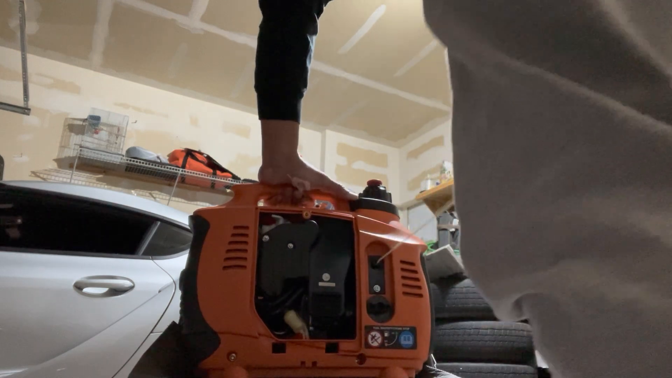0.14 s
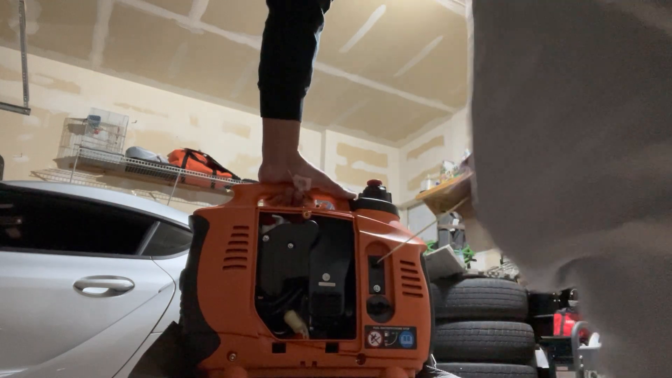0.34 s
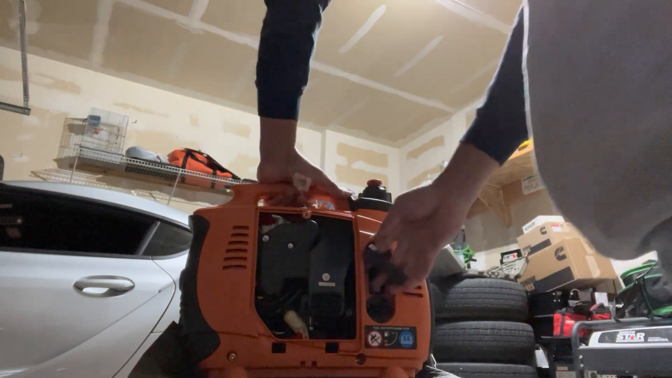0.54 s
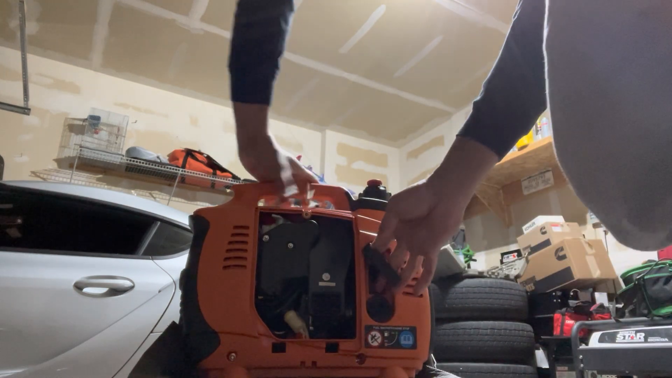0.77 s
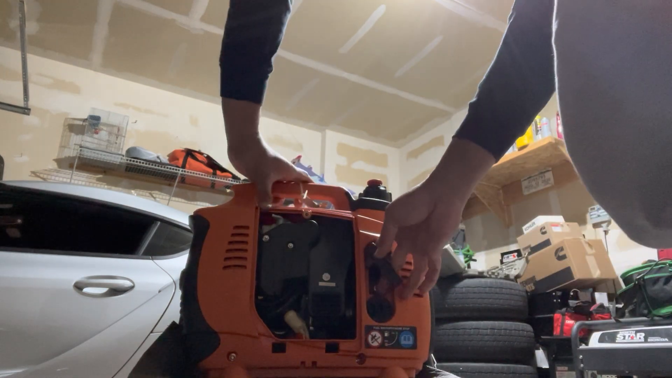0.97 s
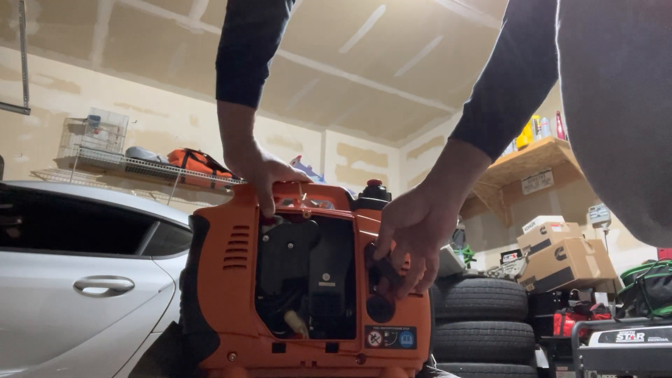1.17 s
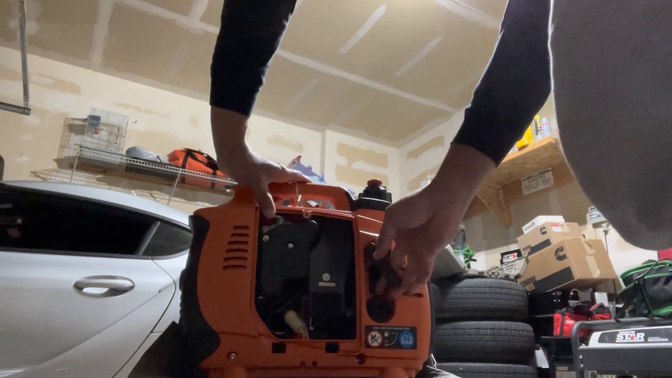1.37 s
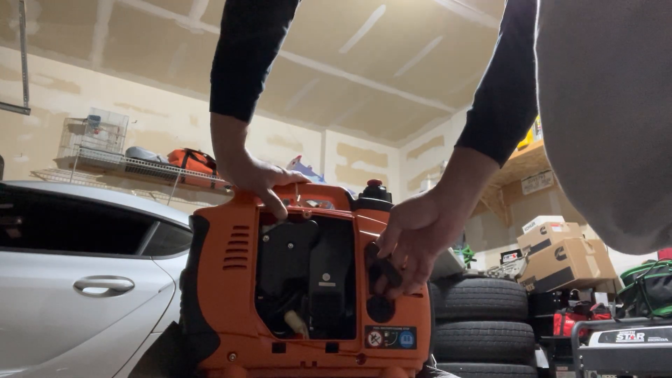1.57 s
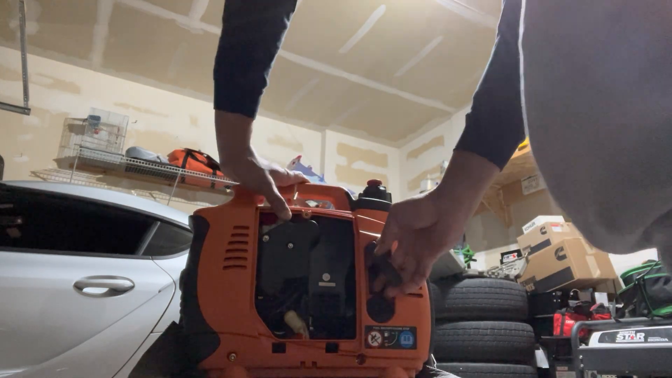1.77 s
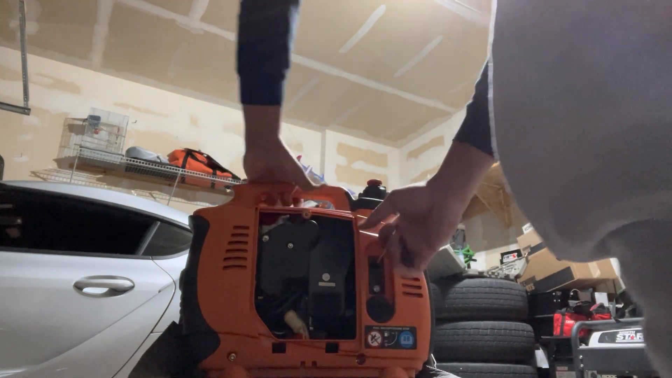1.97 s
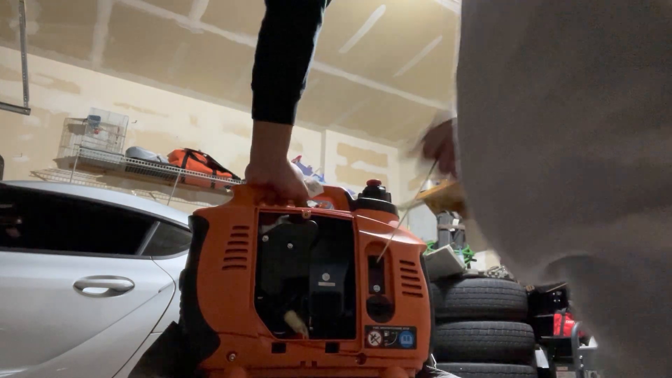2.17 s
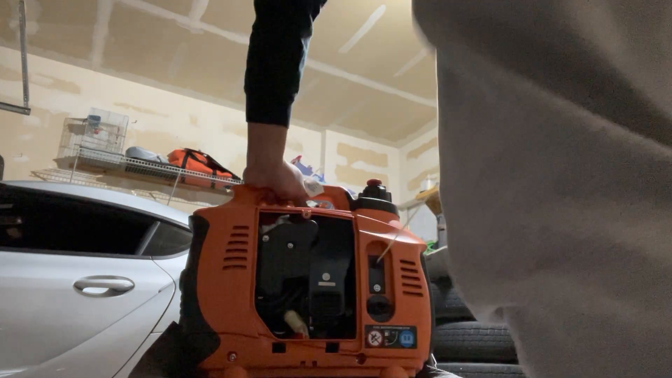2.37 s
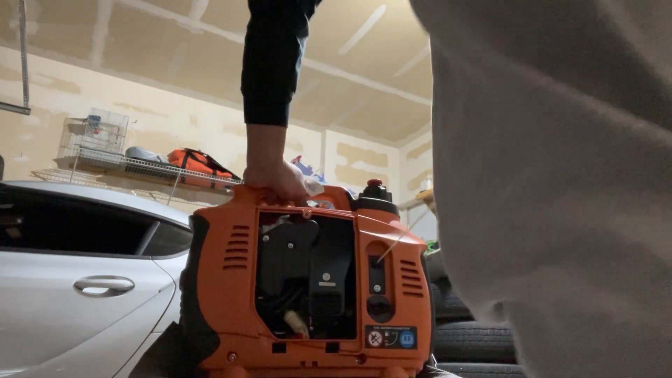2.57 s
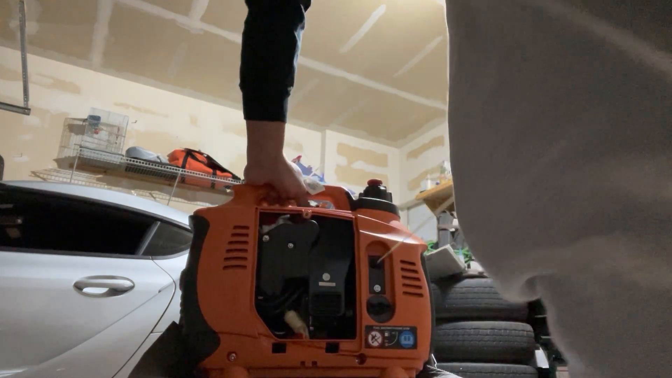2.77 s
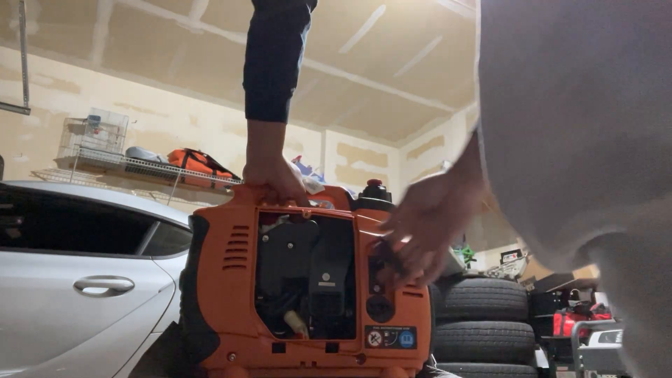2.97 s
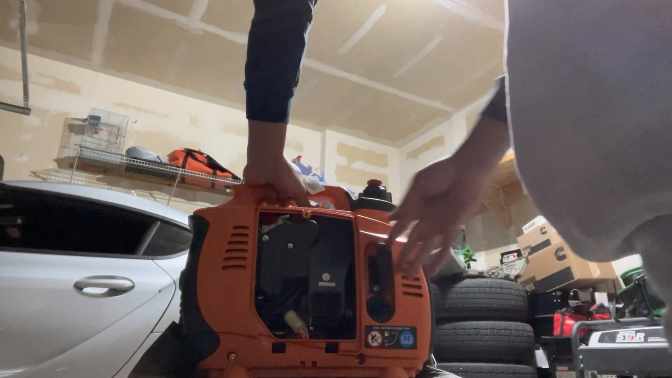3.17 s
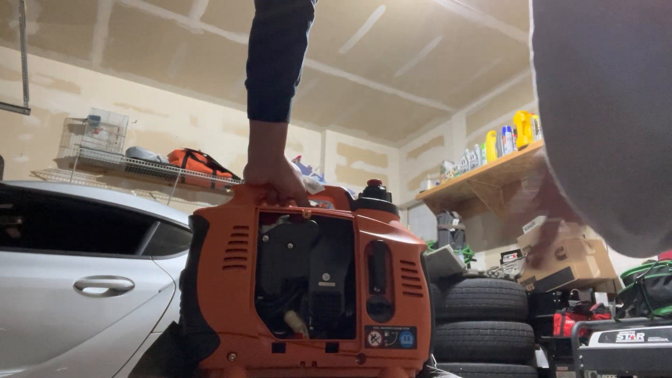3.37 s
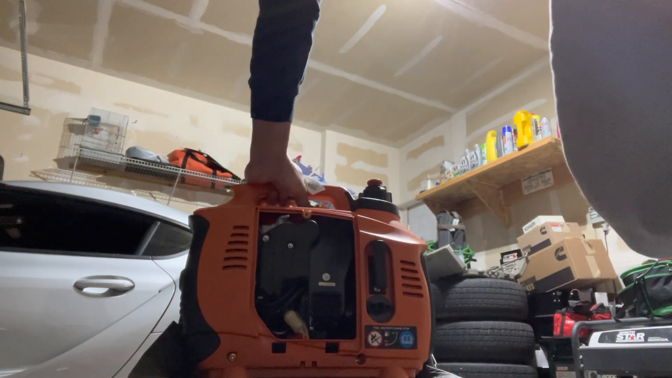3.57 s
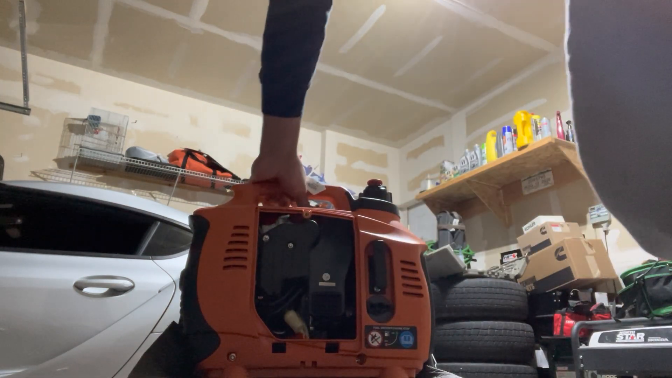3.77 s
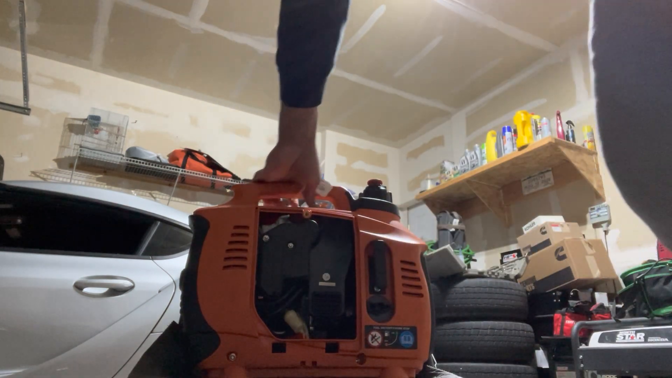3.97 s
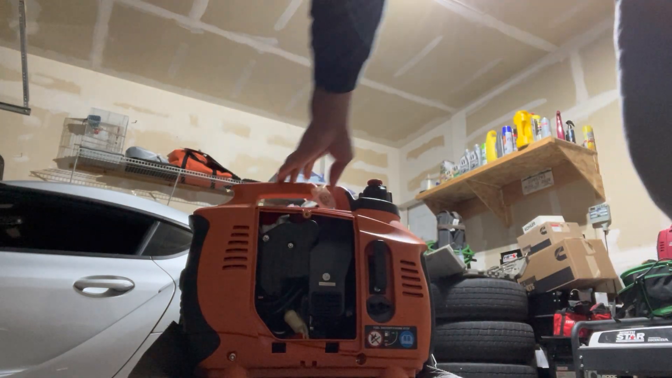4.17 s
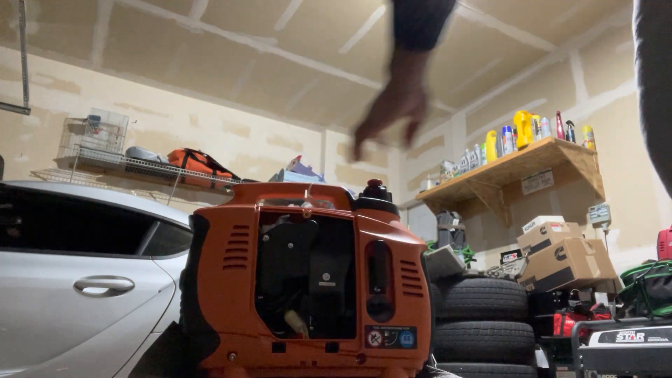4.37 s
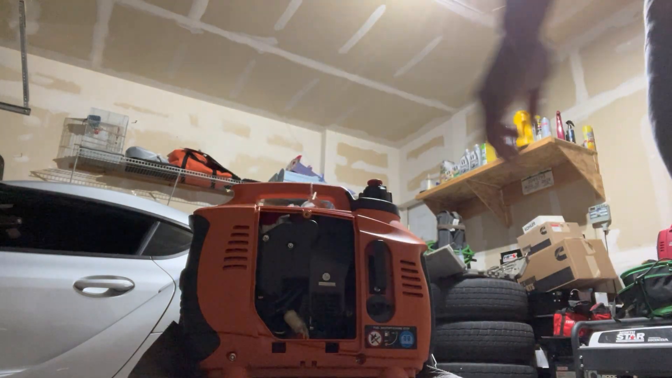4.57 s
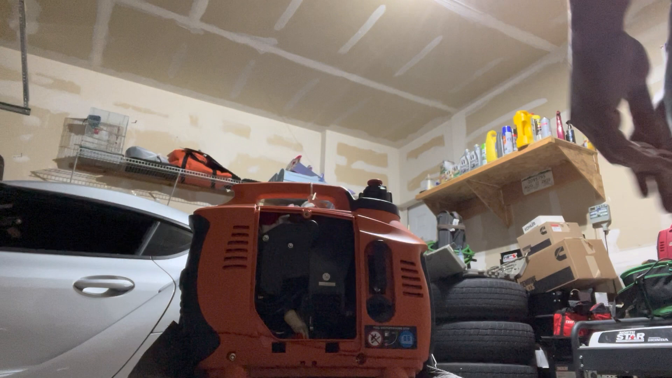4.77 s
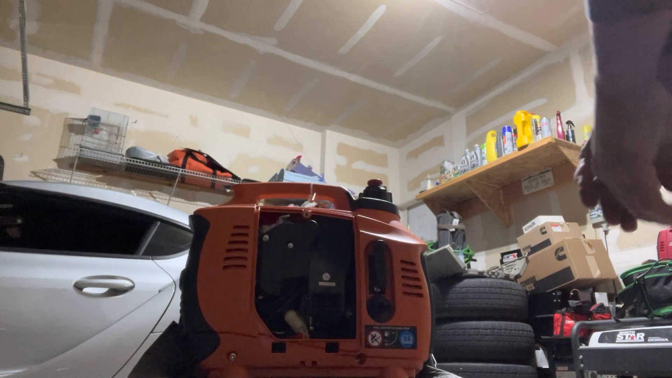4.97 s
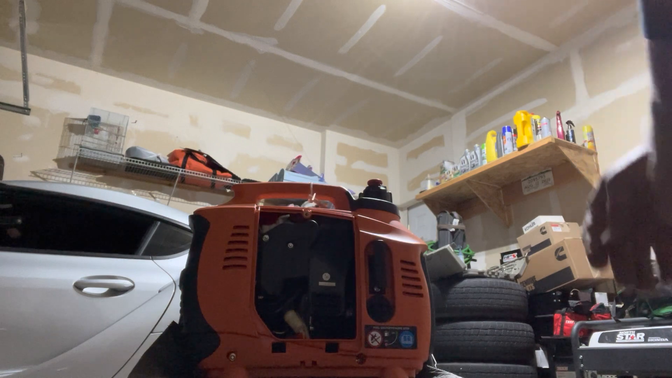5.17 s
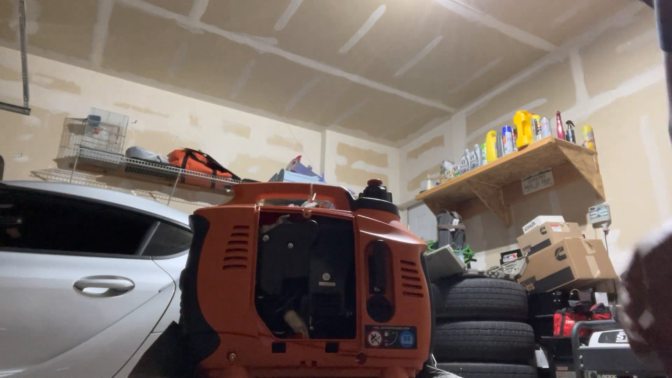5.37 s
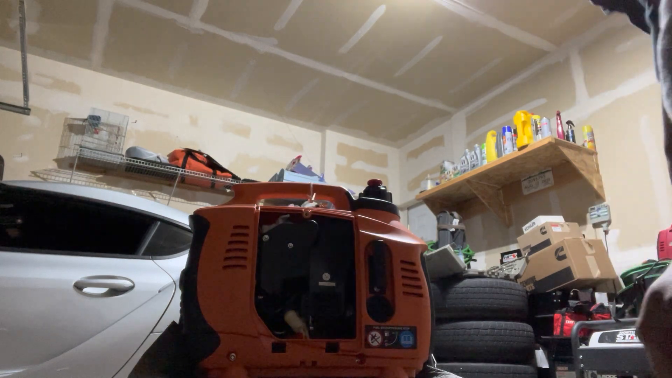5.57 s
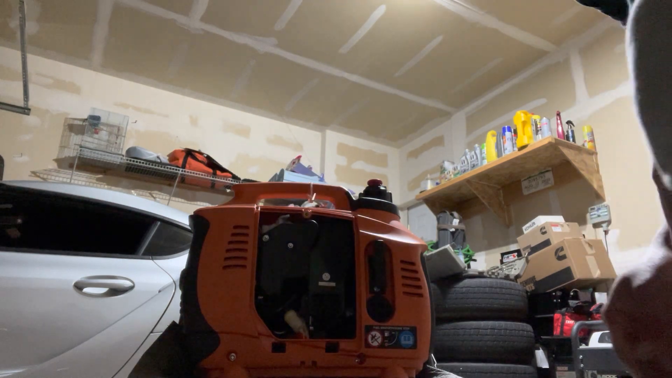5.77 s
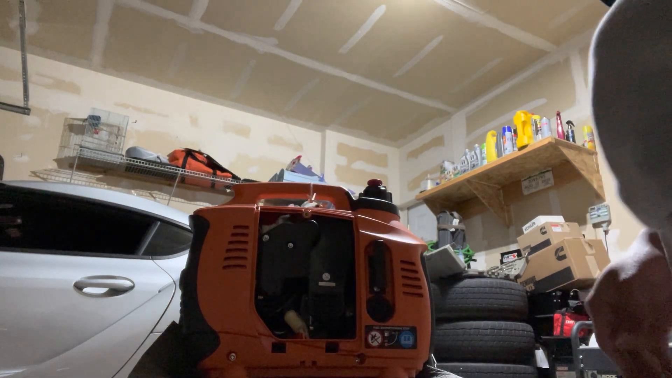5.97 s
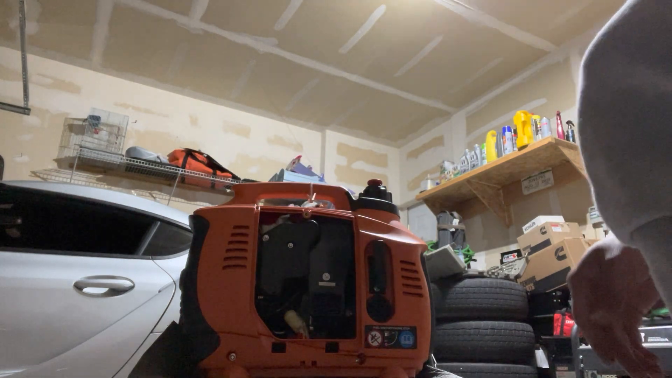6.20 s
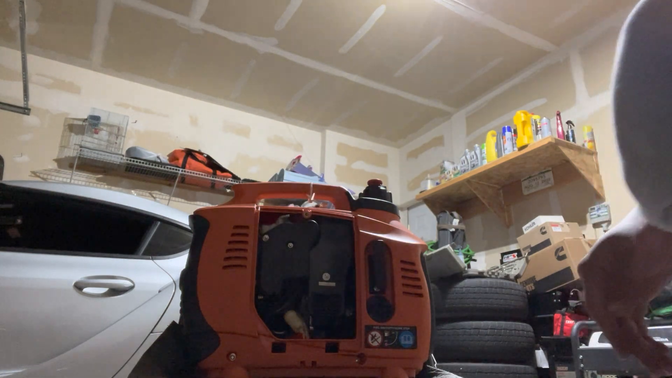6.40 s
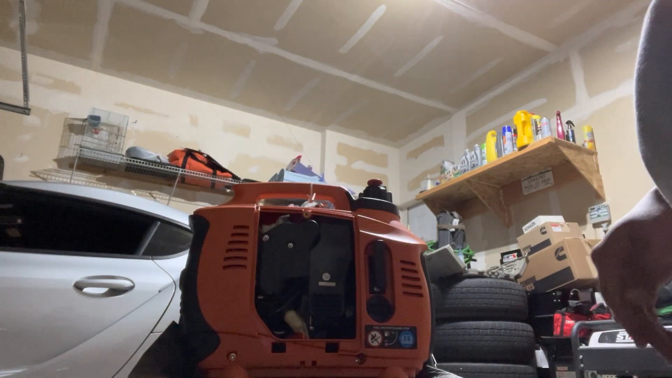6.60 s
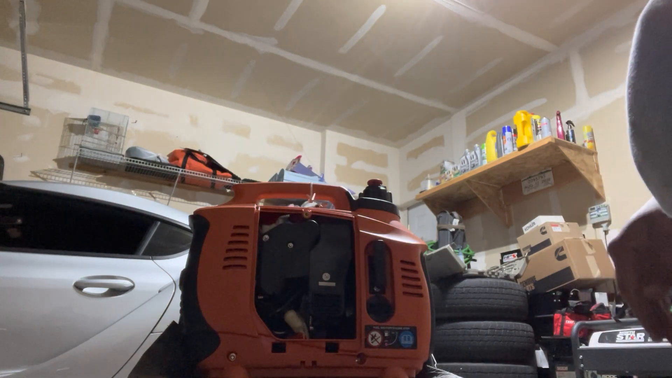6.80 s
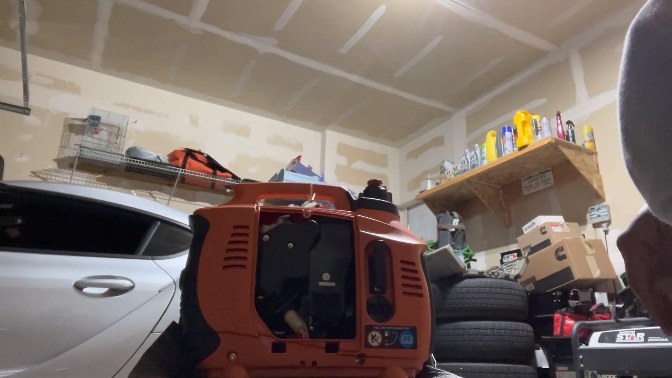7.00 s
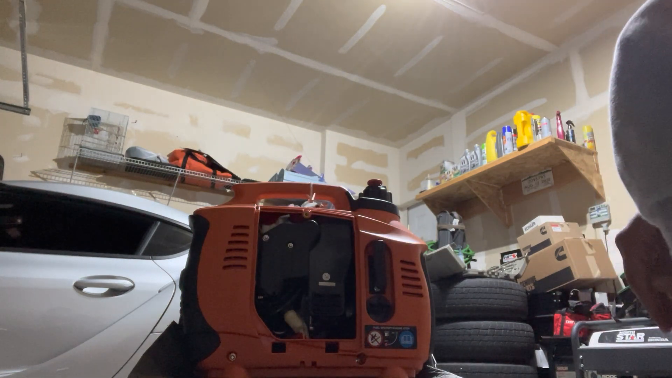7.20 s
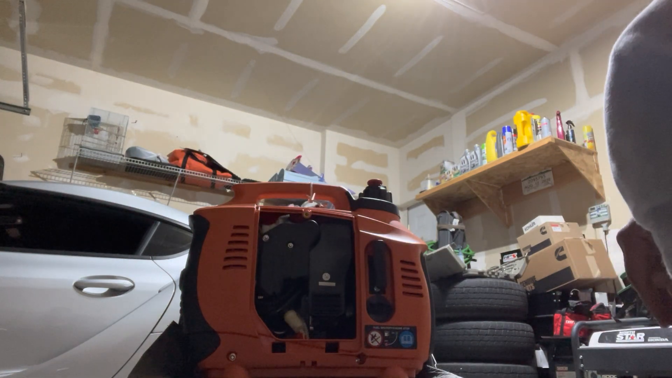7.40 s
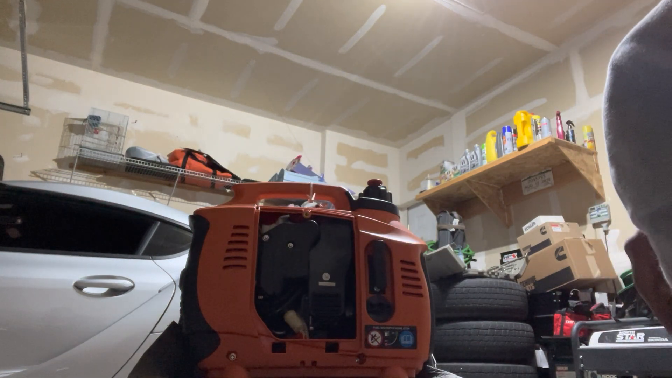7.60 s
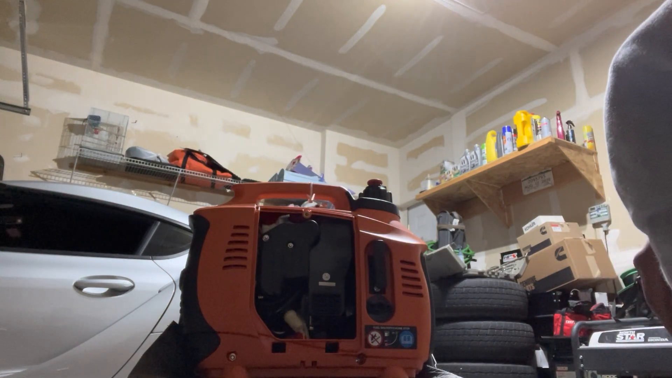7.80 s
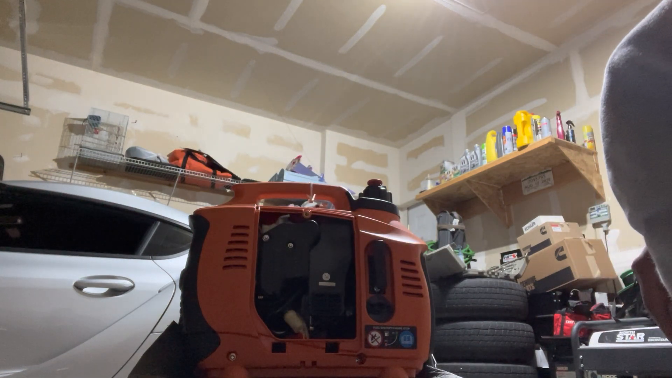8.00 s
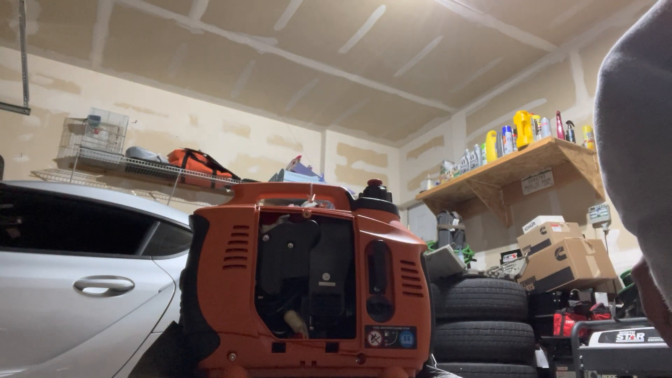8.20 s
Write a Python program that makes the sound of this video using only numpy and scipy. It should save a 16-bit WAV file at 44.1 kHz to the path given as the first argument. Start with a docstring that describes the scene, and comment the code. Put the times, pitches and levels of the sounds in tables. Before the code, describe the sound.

A small portable generator is pull-started, heard from very near in stereo with short garage echo. First come the pawls' plastic rattle and a falling whirr, slowing to sparse dull clacks. After a quiet gap there are snaps, housing knocks and a fresh upward whirr with rope rasp. Firing quickens into a rapid roar with exhaust boom, valve ticking and thin whine, then holds nearly steady.

```python
"""The rumble of a starter reel winding down is heard first, with clacks, as the rope of a small generator runs home.
The choke clicks, the housing is bumped and a second pull whirrs up; the single four-stroke cylinder catches,
races up and settles in a garage. Reel, rope and contacts are coloured noise and struck resonances; knock, exhaust
boom, valve ticks and whine all follow one curve of engine speed."""
import sys
import numpy as np
from scipy import signal
from scipy.fft import rfft, irfft, next_fast_len
from scipy.io import wavfile

SR = 44100
rng = np.random.default_rng(int(sys.argv[2]) if len(sys.argv) > 2 else 0)


def unload_wav(signal):
    """Save mono or channel-first audio to the path in sys.argv[1] as 16-bit WAV at rate SR, clipped to [-1, 1]."""
    wavfile.write(
        sys.argv[1],
        SR,
        np.round(np.clip(np.atleast_2d(signal).T, -1, 1) * 32767).astype(np.int16),
    )


N = 363825
TIME = np.arange(N) / SR

# Levels in dB are relative within the chain that uses them.
# Pulls on the rope. Each row: drawn from in seconds, let back in seconds, rumble in dB, rope hiss in dB.
PULLS = [(-.6, 0.0, -30.5, -45), (1.957, 2.912, -29, -42)]
# Whirrs of the reel. Each row: start in seconds, end in seconds, start pitch in Hz, end pitch in Hz, level in dB.
WHIRRS = [(0.022, .44, 1077, 655, -41), (0.077, 0.254, 742, 646, -51), (2.119, 2.18, 680, 903, -37.5),
          (2.195, 2.521, 721, 1417, -35.5), (2.159, 2.349, 1077, 1320, -44),
          (2.217, 2.344, 1657, 2380, -40)]
# Clacks of the pawls, the handle and loose parts. Each row: time in seconds, level in dB, dull above in Hz.
CLACKS = [(.018, -24, 4500), (.047, -25, 4000), (.058, -22, 1600), (.087, -25, 5000), (.108, -28, 2500),
          (.125, -22, 2600), (.172, -28, 3000), (.2, -24, 3500), (.222, -28, 3000), (.248, -29, 1400),
          (.289, -25, 3500), (.343, -28, 3000), (.388, -28, 3000), (.445, -34, 3500), (.507, -23, 2800),
          (.541, -24, 3200), (.582, -29.5, 3000), (.621, -32, 3000), (.663, -26, 3000), (.708, -32, 3000),
          (.803, -36, 1500), (.843, -38, 3000), (.935, -39, 2600), (1.019, -34, 1700), (1.23, -47, 1300),
          (2.28, -22, 1600), (2.426, -20, 2000), (2.478, -17.5, 3500), (4.872, -20, 3000),
          (5.915, -24, 3000)]
# Short sharp sounds: plastic snaps, the choke's click and, near 2.45-2.62 s, first intake gasps.
# Each row: time in seconds, level in dB, dull above in Hz.
SHARP_SOUNDS = [(0.085, -43, 15000), (0.286, -41.5, 15000), (0.539, -50, 6000), (1.08, -63, 15000),
                (1.459, -62.5, 5000), (1.6497, -29, 7500), (1.853, -53, 4500), (1.9211, -46, 14000),
                (2.191, -45, 15000), (2.417, -44, 15500), (2.447, -27.5, 13900), (2.577, -39, 14000),
                (2.606, -37, 14000), (2.622, -37, 14000), (2.905, -33, 15000), (2.9956, -18.5, 2620)]
# Soft bumps on the housing. Each row: time in seconds, level in dB, pitch in Hz.
BUMPS = [(0.825, -29, 232), (0.837, -31, 233), (0.839, -24.5, 105), (1.949, -27, 490), (1.962, -24.5, 394),
         (1.996, -24, 314), (2, -34, 674), (4.872, -23, 110)]
# Resonances of the plastic shell. Each row: frequency in Hz, width in Hz, level in dB.
SHELL_MODES = [(275, 40, -3), (385, 30, -5), (750, 60, -1), (990, 110, 5), (1200, 70, 3), (1940, 300, -13),
               (3500, 500, -21), (4070, 200, -19)]
# Exhaust and room boom. Each row: frequency in Hz, width in Hz, level in dB.
BOOM_MODES = [(158.4, 18, 18), (231.1, 11.5, 24), (247.7, 24.6, 22), (266.3, 4.1, 18), (311.6, 26.5, 18),
              (353.3, 13, 14.5), (437, 34, 14), (476, 6.9, 7), (521, 9, 12)]
# Engine block and housing. Each row: frequency in Hz, width in Hz, level in dB.
BLOCK_MODES = [(576, 19, 4), (649.2, 41.7, 23), (688, 26, 11), (778, 6.3, -2), (927, 30, 0.5),
               (1141, 89, 8.5), (1212, 30, 15), (1260, 34, 16), (1293, 14, 11), (1463, 27, 11.5),
               (1600, 32, 12.5)]
# First blow of each firing, straight from the open casing. Each row: frequency in Hz, width in Hz, level in dB.
BARK_MODES = [(670, 330, 9.5), (1250, 300, 4)]
# Thin rings of the valve cover. Each row: frequency in Hz, width in Hz, level in dB.
COVER_MODES = [(2920, 81, 4.5), (3610, 110, 3), (4460, 36, 1.5)]
# Valve gear contacts. Each row: place in the cycle from 0 to 1, level in dB.
VALVES = [(0.02, 5.5), (0.131, 3.5), (0.301, 0), (0.409, 4.5), (.6, -5), (.8, -11)]
# Noise spectra of the sources and of the echo. Each row: frequency in Hz, density in dB per Hz.
REEL_SPECTRUM = [(29, -17), (50, -9), (75, -0.5), (187, -5.5), (273, 4.5), (335, -5), (377, 0.5),
                 (532, -5.5), (711, 1.5), (900, -7.5), (1250, -12.5), (1560, -16), (2240, -16.5),
                 (3000, -40), (3900, -59), (6600, -120)]
ROPE_SPECTRUM = [(1470, -37), (2500, -2), (2790, -6.5), (3690, -1.5), (5440, -10.5), (7590, -17),
                 (7950, -17.5), (13800, -15.5), (16000, -23)]
CHURN_SPECTRUM = [(230, -4), (330, -4), (450, -1.5), (560, -2), (700, 2.5), (850, -1), (1250, -2),
                  (1400, -9), (2100, -15), (2500, -18)]
METAL_SPECTRUM = [(880, 0), (1500, -11), (1980, 0), (2860, -10), (3690, -5.5), (3840, -7.5), (4590, -6.5),
                  (5440, -14.5), (6310, -11.5), (7240, -24), (8570, -18), (12700, -21), (16000, -25)]
SHARP_SPECTRUM = [(300, -4.5), (600, -6.5), (1000, 1.5), (1500, -11.5), (2100, -3.5), (2900, -16),
                  (4000, -2.5), (4700, -11), (5400, -9), (7500, -16.5), (10000, -13.5), (16000, -9)]
INTAKE_SPECTRUM = [(1500, 6), (2600, 3), (3500, 10), (4600, 8), (5600, -9), (15000, -26)]
AIR_SPECTRUM = [(18, -36), (30, -23), (59, 4), (71, 4), (252, -10.5), (355, -6.5), (499, -15), (866, -15),
                (1760, -35), (4080, -47), (7090, -47), (16000, -57)]
ECHO_SPECTRUM = [(60, 10.5), (200, 3), (500, 9.5), (4000, -1.5), (15000, -5)]
# Left-right likeness of diffuse noise. Each row: frequency in Hz, correlation.
LIKENESS = [(100, .95), (300, .72), (1000, .6), (2000, .5), (4000, .3), (8000, .25), (12000, .84)]
# Engine speed; a cycle is two turns of the crank. Each row: time in seconds, cycles per second.
ENGINE_SPEED = [(2.14, 0), (2.4, 12.15), (2.55, 19.58), (2.7, 26), (2.85, 31.39), (3, 35.88), (3.25, 41.75),
                (3.5, 45.1), (3.85, 47.95), (4.15, 49.17), (4.8, 49.82), (5.05, 49.5), (5.4, 48.93),
                (5.85, 48.16), (6.65, 46.43), (7.35, 45.36), (7.8, 45.87), (8.25, 45.08)]
# Answer of machine and floor to rocking. Each row: rate in Hz, level in dB.
ROCKING = [(33, -63), (45, -52), (52, -38.5), (68, -35.5), (79, -30), (84, -24.5), (89, -40), (100, -40)]
# Drone of the casing on multiples of the firing rate. Each row: frequency in Hz, level of a line there in dB.
DRONE = [(130, -57.5), (190, -62.5), (235, -39.5), (280, -48.5), (335, -46), (400, -55.5), (450, -46),
         (510, -54), (620, -43.5), (730, -46), (830, -72), (920, -50), (980, -62), (1120, -53),
         (1310, -48.5), (1380, -49), (1470, -53), (1540, -67), (1610, -56), (1800, -56)]
# Whine of fan and gears. Each row: multiple of the cycle, housing resonance in Hz, width in Hz, level in dB.
WHINES = [(40, 1952, 145, -44), (60, 2975, 150, -61), (80, 3660, 150, -56.5), (79, 3890, 150, -62),
          (90, 4440, 120, -62), (96, 4440, 130, -61)]
# Phase between the two listening points. Each row: frequency in Hz, lead of the left in radians.
LEFT_LEAD = [(60, .05), (500, .14), (2000, .35), (4500, .6), (8000, 1), (12000, .6)]
# Balance between the two listening points. Each row: frequency in Hz, left minus right in dB.
LEFT_BALANCE = [(60, -1), (125, -2), (250, -1.3), (500, -.8), (1000, .6), (2000, .2), (4000, .8), (8000, 0)]

AIR_DB, GARAGE_T60_S, CUTOFF_HZ = -59, 0.49, 15900
# the reel spins up under the pull and coasts to rest; its noise grows with its speed
REEL_SPIN_UP_S, REEL_COAST_S, REEL_DB_PER_DECADE = 0.42, 1.3, 48
RUMBLE_FLUTTER_DB, RATTLE_UNEVEN_DB, RATTLE_DB = 1.8, 3, -11
# a pull starts with quiet slack; the rope hisses most as it runs back in
SLACK_S, SLACK_DB = 0.16, -25
REWIND_S, REWIND_DB = 0.18, 1.5
# height of a clack's tap against its scuff, the scuff's decay, their level, variation between modes and clacks
CLACK_TAP, CLACK_SCUFF_S, CLACK_DB, CLACK_VARIES_DB = 5, .007, 9, 2.5
# fade of a whirr, wobble as a share of its pitch, unevenness of its level
WHIRR_FADE_S, WHIRR_WOBBLE, WHIRR_FLUTTER_DB = 0.057, .11, 3
# the throttle stays wide open, then eases back exponentially
THROTTLE_OPEN_UNTIL_S, THROTTLE_EASE_S = 2.79, 1.0
# levels with the throttle eased back, and what a wide-open throttle adds
LOAD_DB, LOAD_THROTTLE_DB = -31, 6
GEAR_DB, GEAR_THROTTLE_DB = -48.5, 6.5
# firing begins during the second pull, weak at first (share of full power 0-1); then the engine catches
FIRST_FIRING_S, FIRING_BUILDS_S = 2.17, 0.49
WEAK_SHARE, CATCH_S, CATCH_TAKES_S = 0.28, 2.775, 0.5
FIRING_ROCK_DB = -1.5   # the firing, against the unbalanced crank
# a wide-open throttle adds to the drone, and more to its bass below an edge
DRONE_THROTTLE_DB, DRONE_BASS_DB, DRONE_BASS_HZ = 5, 9, 192
DRONE_TURN_HZ = 45   # a line's phase turns by about a radian as it glides this far
# a wide-open throttle hardens the knock: setting of the added treble and its lower edge
HARD_KNOCK_DB, HARD_KNOCK_HZ = 5, 1100
SLAP_DB, CHURN_DB = -16, -10.5   # against the firing
WHINE_WANDER = .35   # radians
# the intake gasps hard while the engine is starved, then sinks to a steady gulping
GASP_FROM_S, GASP_UNTIL_S, GASP_DB, GULP_DB = 2.58, 2.84, -31, -41
GASP_RISE_DB_PER_S, GASP_FALL_DB_PER_S = 72, 49
# the walls spread the firings between the ears: their level, and the share that stays in the centre
SPREAD_DB, SPREAD_CENTRE = -13, .2


def from_db(db):
    """Logarithmic level: 20 dB is a tenfold amplitude."""
    return 10 ** (np.asarray(db) / 20)


def rms_one(x):
    """Power normalisation: scale to an rms of 1."""
    return x / np.sqrt(np.mean(x ** 2) + 1e-20)


def ramp(start_s, length_s):
    """Linear onset: 0 before the start, rising straight to 1 over the length."""
    return np.clip((TIME - start_s) / length_s, 0, 1)


def since(start_s):
    """Elapsed time: seconds gone by since a moment, 0 before it."""
    return np.maximum(TIME - start_s, 0)


def drift(rate):
    """Random modulation: Gaussian values drawn at a rate in Hz and joined by straight lines."""
    return np.interp(TIME * rate, np.arange(6000), rng.standard_normal(6000))


def at_hz(points, hz):
    """Frequency response: read a (Hz, value) table on a log-frequency axis."""
    table_hz, values = np.transpose(points)
    return np.interp(np.log(hz + 1), np.log(table_hz), values)


def noise(spectrum, size=N):
    """Spectral shaping and partial coherence: coloured stereo noise, steep outside its ends; rms 1."""
    n = next_fast_len(size)
    bin_hz = np.arange(n // 2 + 1) * SR / n
    log_hz = np.log(bin_hz + 1)
    table_hz = np.array(spectrum)[:, 0]
    outside = log_hz - np.clip(log_hz, np.log(table_hz[0]), np.log(table_hz[-1]))
    gain = from_db(at_hz(spectrum, bin_hz) - 50 * abs(outside))
    alike = np.clip(at_hz(LIKENESS, bin_hz), -1, 1)
    white = rfft(rng.standard_normal((2, n)))
    mid, side = white * gain * np.sqrt([1 + alike, 1 - alike])
    return rms_one(irfft([mid + side, mid - side], n)[:, :size])


def tail(spectrum, t60, size=SR // 2):
    """Reverberation: dense modes decay exponentially as a stereo impulse response of unit energy."""
    ring = noise(spectrum, size=size) * from_db(-60 * TIME[:size] / t60)
    return rms_one(ring) / np.sqrt(size)


def through(x, response):
    """Linear superposition: convolve a sound with a stereo impulse response."""
    return signal.oaconvolve(np.atleast_2d(x), response, axes=1)[:, :N]


def resonate(x, modes):
    """Modal resonance: parallel two-pole resonators, each of gain about 1 at its peak before its level."""
    out = 0
    for hz, width, db in modes:
        r = np.exp(-np.pi * width / SR)
        poles = [1, -2 * r * np.cos(2 * np.pi * hz / SR), r * r]
        gain = from_db(db) * (1 - r * r) / 2
        out = out + gain * signal.lfilter([1, 0, -1], poles, x + 1e-18)
    return out


def cut(x, kind, edge_hz):
    """Band limiting: fourth-order high- or low-pass."""
    return signal.sosfilt(signal.butter(4, edge_hz, kind, fs=SR, output="sos"), x)


def dulled(x, edge_hz):
    """Treble loss: a second-order low-pass dulls a sound."""
    return signal.lfilter(*signal.butter(2, min(edge_hz, CUTOFF_HZ), fs=SR), x)


def blows(rows, decay_s):
    """Exponential decay: an envelope jumps at each (s, dB) and dies away."""
    jumps = np.zeros(N)
    for s, db in rows:
        jumps[int(s * SR)] += from_db(db)
    return signal.lfilter([1], [1, -np.exp(-1 / (decay_s * SR))], jumps + 1e-18)


def strokes(cycles, place, jitter_s, uneven_db):
    """Periodic excitation: one slightly uneven click a cycle, of about unit power at any speed."""
    turning = cycles > 0
    wanted = np.arange(1, int(cycles[-1] - place) + 1) + place
    times = np.interp(wanted, cycles[turning], TIME[turning])
    late, strong = rng.standard_normal((len(times), 2)).T
    clicks = np.zeros(N)
    at = np.clip(np.round((times + jitter_s * late) * SR).astype(int), 0, N - 1)
    clicks[at] = np.sqrt(np.gradient(times) * SR) * from_db(uneven_db * strong)
    return clicks


def puff(cycles, place, length):
    """Periodic flow: a gate opens once a cycle and closes over a share of it; rms 1."""
    age = (cycles - place) % 1 / length
    return rms_one(age * np.exp(-age))


def starter():
    """Friction and impact noise: the reel rumbles, pawls rattle on the shell, the rope rasps in its guide."""
    rumble = noise(REEL_SPECTRUM) * from_db(RUMBLE_FLUTTER_DB * drift(55))
    # about 45 chance contacts a second
    touches = (rng.random(N) < 45 / SR) * from_db(RATTLE_UNEVEN_DB * rng.standard_normal(N))
    shell = cut(resonate(touches, SHELL_MODES), "low", edge_hz=2700)
    rattle = rms_one(through(shell, tail(ECHO_SPECTRUM, t60=0.033, size=4096)))
    reel = from_db(-1.5) * rumble + from_db(RATTLE_DB) * rattle
    rasp = noise(ROPE_SPECTRUM) * rms_one(from_db(3.3 * drift(170)))
    out = 0
    for drawn_s, back_s, rumble_db, hiss_db in PULLS:
        reel_speed = ramp(drawn_s, REEL_SPIN_UP_S) * (1 - ramp(back_s, REEL_COAST_S))
        slack = from_db(SLACK_DB) * ramp(drawn_s - SLACK_S, SLACK_S / 2) * (TIME < back_s)
        spin = np.maximum(reel_speed ** (REEL_DB_PER_DECADE / 20), slack)
        rewind_db = REWIND_DB * np.exp(-((TIME - back_s) / REWIND_S) ** 2)
        rope = from_db(hiss_db + rewind_db - 2.0) * rasp
        out = out + spin * (from_db(rumble_db) * reel + rope)
    return out


def clack_contacts():
    """Contact mechanics: each clack is a tap and a brief scuff, duller for a softer touch."""
    out, age = np.zeros(N), TIME[:2048]
    for s, db, hz in CLACKS:
        at = int(s * SR)
        scuff = np.exp(-age / CLACK_SCUFF_S) * rng.standard_normal(len(age))
        contact = CLACK_TAP * (age == 0) + scuff
        out[at:at + len(age)] += dulled(from_db(db) * contact, hz)
    return out


def short_sounds():
    """Transient excitation: clacks ring the shell, snaps and first gasps are noise bursts, bumps thud."""
    contacts, clacks = clack_contacts(), 0
    for mode in SHELL_MODES:
        clacks = clacks + resonate(contacts * from_db(CLACK_VARIES_DB * drift(20)), [mode])
    hiss = from_db(4.5) * noise(SHARP_SPECTRUM)
    bursts = sum(dulled(blows([(s, db)], decay_s=0.0064) * hiss, hz) for s, db, hz in SHARP_SOUNDS)
    bumps, push = 0, rng.standard_normal(N)
    for s, db, hz in BUMPS:
        thud = resonate(blows([(s, db)], decay_s=0.01) * push, [(hz, hz * 0.21, 0)])
        bumps = bumps + resonate(thud, [(hz, hz * 1.15, 17)])
    return from_db(CLACK_DB) * clacks + bursts + bumps


def whirr():
    """Frequency modulation: rough, broken tones glide with the spinning reel."""
    out = 0
    for start_s, end_s, start_hz, end_hz, db in WHIRRS:
        hz = start_hz + (end_hz - start_hz) * ramp(start_s, end_s - start_s)
        fade_in = ramp(start_s - WHIRR_FADE_S / 2, WHIRR_FADE_S)
        fade_out = 1 - ramp(end_s - WHIRR_FADE_S / 2, WHIRR_FADE_S)
        phase = 2 * np.pi * np.cumsum(hz * (1 + WHIRR_WOBBLE * drift(400))) / SR
        level = from_db(db + 1.5 + WHIRR_FLUTTER_DB * drift(90))
        out = out + fade_in * fade_out * level * np.sin(phase)
    return out


def shake(cycles, speed):
    """Forced vibration: firing and unbalanced crank drive two low tones, weighted by the rocking response."""
    hz, db = np.transpose(ROCKING)
    angle = 2 * np.pi * cycles
    firing = from_db(np.interp(speed, hz, db) + FIRING_ROCK_DB) * np.sin(angle)
    crank = from_db(np.interp(2 * speed, hz, db)) * np.sin(2 * angle)
    return np.sqrt(2) * (firing + crank)


def fan(cycles, speed):
    """Tonal whine: blades and gears sing on high multiples of the cycle, swelling in housing resonances."""
    tones = 0
    for multiple, hz, width_hz, db in WHINES:
        off_peak = (multiple * speed - hz) / (width_hz / 2)
        level = from_db(db) / np.hypot(1, off_peak ** 2)
        tones = tones + level * np.sin(2 * np.pi * multiple * cycles + WHINE_WANDER * drift(40))
    return np.sqrt(2) * from_db(1.0 + 0.72 * drift(25)) * tones


def drone(cycles, speed, throttle, count=38):
    """Harmonic radiation: lines on multiples of the firing rate shift in level and phase as they glide."""
    out, grid_hz = 0, np.arange(0, 2400, DRONE_TURN_HZ)
    for k in range(3, count):
        hz = k * speed
        bass_db = DRONE_BASS_DB / (1 + (hz / DRONE_BASS_HZ) ** 8)
        db = at_hz(DRONE, hz) + throttle * (DRONE_THROTTLE_DB + bass_db)
        # a random walk of phase over frequency keeps the beating changing
        turn = np.interp(hz, grid_hz, np.cumsum(rng.standard_normal(len(grid_hz))))
        out = out + from_db(db) * np.sin(2 * np.pi * k * cycles + turn)
    return np.sqrt(2 * speed / speed.max()) * out


def cylinder(cycles, load_db, effort):
    """Impulsive pressure: each firing barks and knocks the block, harder under effort; the exhaust booms."""
    firing = strokes(cycles, 0.0026, jitter_s=.000015, uneven_db=.5) * from_db(load_db - 2.3)
    hard = signal.lfilter(*signal.butter(1, HARD_KNOCK_HZ, "high", fs=SR), firing * effort)
    ringing = resonate(firing + from_db(HARD_KNOCK_DB - 7) * hard, BLOCK_MODES)
    # the pressure rise lasts a fraction of a millisecond, so the knock is round
    knock = cut(cut(ringing, "high", edge_hz=420), "low", edge_hz=1204)
    bark = cut(resonate(firing, BARK_MODES), "low", edge_hz=1440)
    exhaust = strokes(cycles, 0.4027, jitter_s=.00002, uneven_db=0.2) * from_db(load_db - 0.14)
    boom = cut(cut(resonate(exhaust, BOOM_MODES), "high", edge_hz=201), "low", edge_hz=667)
    return knock + bark + boom


def loose_parts(cycles, load_db):
    """Clearance impact: the piston slaps a turn after each firing; loose parts churn in between."""
    clicks = strokes(cycles, .57, jitter_s=.00002, uneven_db=3.0) * from_db(load_db + SLAP_DB)
    slap = through(clicks, tail(CHURN_SPECTRUM, t60=0.053, size=4096))
    surge = 1.4 + 0.49 * puff(cycles, 0.073, length=0.057)
    return slap + noise(CHURN_SPECTRUM) * from_db(load_db + CHURN_DB) * surge


def valve_gear(cycles, gear_db):
    """Dense modal ringing: every contact rings the metal in its own way, over the hiss of cooling air."""
    ticks = 0
    for place, db in VALVES:
        touches = strokes(cycles, place, jitter_s=.00001, uneven_db=0.3) * from_db(db)
        ticks = ticks + through(touches, tail(METAL_SPECTRUM, t60=0.11, size=4096))
    ticks = ticks + resonate(ticks, COVER_MODES)
    hiss = noise(METAL_SPECTRUM) * (1.36 + 0.25 * puff(cycles, 0.031, length=0.073))
    return from_db(gear_db) * (from_db(-6.0) * ticks + from_db(1.5) * hiss)


def intake(cycles, throttle):
    """Pulsed turbulence: the carburettor gulps air once a cycle, with a crackle."""
    gulp = puff(cycles, 0.54, length=0.088) * from_db(1.0 * drift(650))
    opening = from_db(-GASP_RISE_DB_PER_S * np.maximum(GASP_FROM_S - TIME, 0))
    gasp = from_db(GASP_DB - GASP_FALL_DB_PER_S * since(GASP_UNTIL_S))
    level = np.maximum(gasp, from_db(GULP_DB) * throttle)
    return noise(INTAKE_SPECTRUM) * from_db(-7.0) * opening * level * gulp * (cycles > 0)


def two_ears(x):
    """Interaural difference: off centre, each pitch reaches the two listening points with its own lead and level."""
    n = next_fast_len(N + 4096)
    hz = np.arange(n // 2 + 1) * SR / n
    left = from_db(at_hz(LEFT_BALANCE, hz) / 2) * np.exp(.5j * at_hz(LEFT_LEAD, hz))
    return irfft(rfft(x, n) * np.array([left, 1 / left]), n)[:, :N]


def scene():
    """Superposition: engine, starter and hands, close by in a reflective garage, over quiet air noise."""
    speed = np.interp(TIME, *np.transpose(ENGINE_SPEED))
    cycles = np.cumsum(speed) / SR
    throttle = np.exp(-since(THROTTLE_OPEN_UNTIL_S) / THROTTLE_EASE_S)
    load_db = LOAD_DB + LOAD_THROTTLE_DB * throttle
    gear_db = GEAR_DB + GEAR_THROTTLE_DB * throttle
    firing = ramp(FIRST_FIRING_S, FIRING_BUILDS_S) ** 2
    caught = firing * (WEAK_SHARE + (1 - WEAK_SHARE) * ramp(CATCH_S, CATCH_TAKES_S))

    # as the engine catches, it takes over from the starter at equal power
    start_up = np.sqrt(1 - caught) * starter() + short_sounds() + whirr()
    chug = np.sqrt(caught) * cylinder(cycles, load_db, throttle * caught)
    mechanics = loose_parts(cycles, load_db) + valve_gear(cycles, gear_db)
    clatter = np.sqrt(caught) * mechanics + intake(cycles, throttle)
    tones = shake(cycles, speed) + fan(cycles, speed) + firing * drone(cycles, speed, throttle)

    walls = tail(ECHO_SPECTRUM, t60=GARAGE_T60_S)
    garage = through(from_db(-8.5) * clatter + from_db(-11.0) * start_up, walls)
    wide_walls = walls - (1 - SPREAD_CENTRE) * walls.mean(axis=0)
    spread = through(from_db(SPREAD_DB) * chug, wide_walls)
    machine = start_up + chug + clatter + tones + garage + spread
    return two_ears(machine) + from_db(AIR_DB) * noise(AIR_SPECTRUM)


def record(dry):
    """Band limitation: a steep elliptic low-pass cuts the top."""
    return signal.sosfilt(signal.ellip(10, .1, 80, CUTOFF_HZ, fs=SR, output="sos"), dry)


dry = scene()
out = record(dry)
unload_wav(out)
```